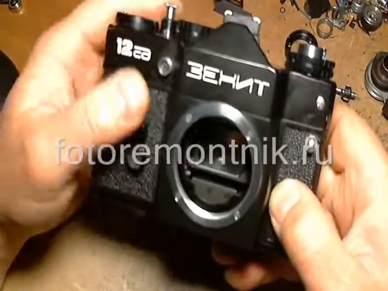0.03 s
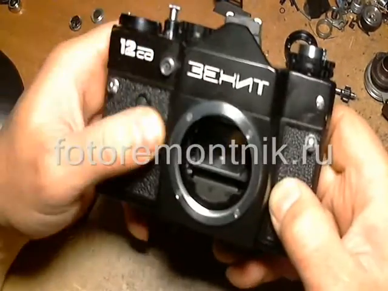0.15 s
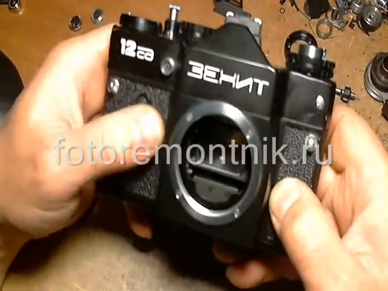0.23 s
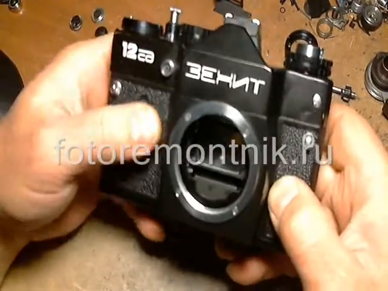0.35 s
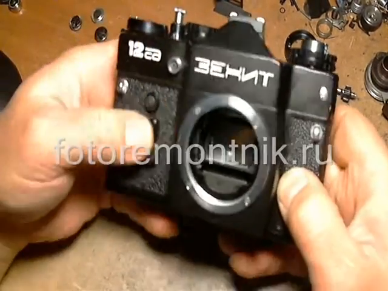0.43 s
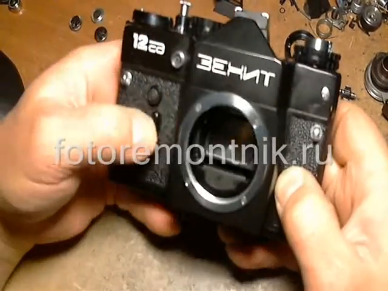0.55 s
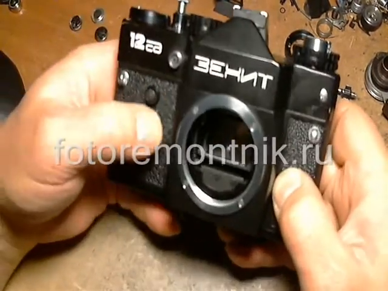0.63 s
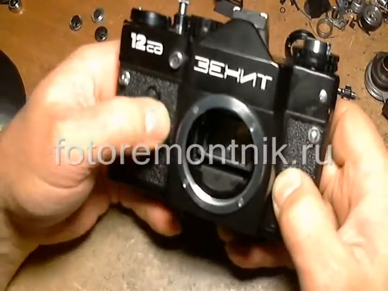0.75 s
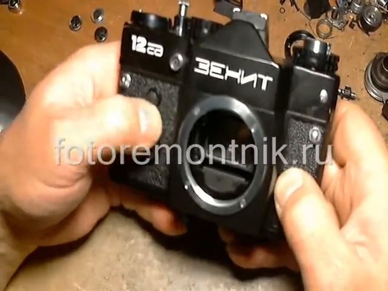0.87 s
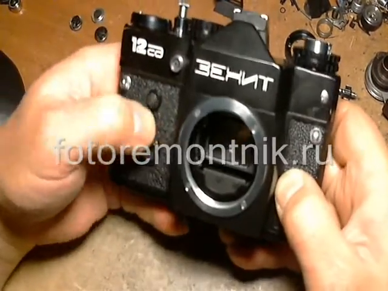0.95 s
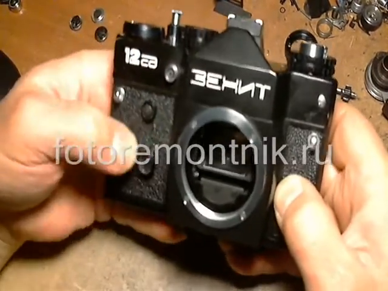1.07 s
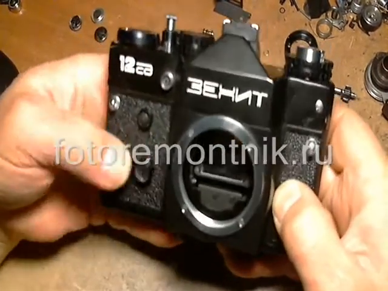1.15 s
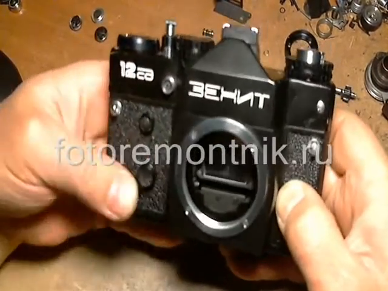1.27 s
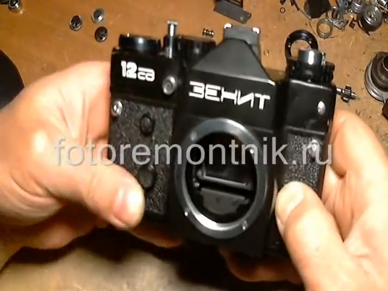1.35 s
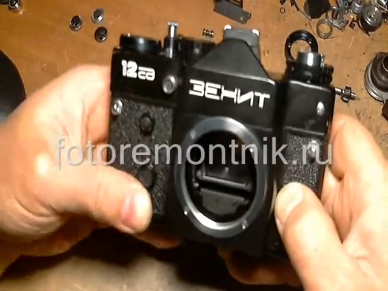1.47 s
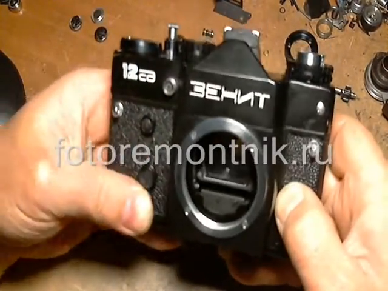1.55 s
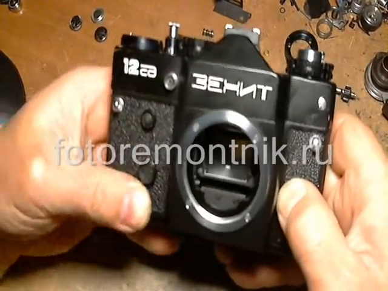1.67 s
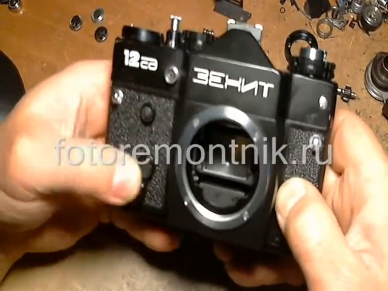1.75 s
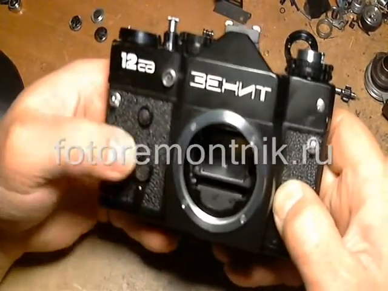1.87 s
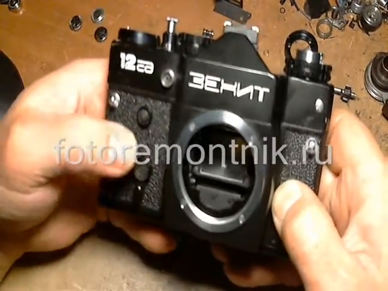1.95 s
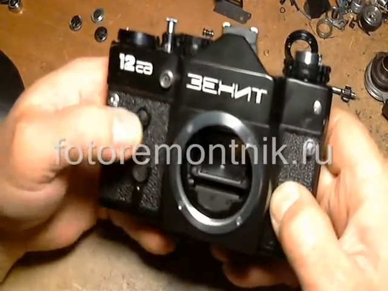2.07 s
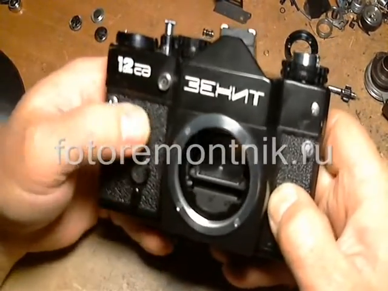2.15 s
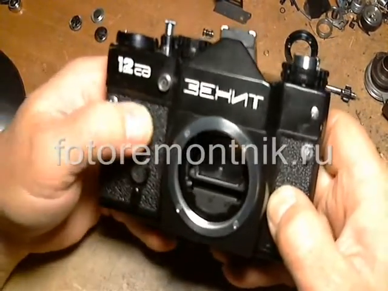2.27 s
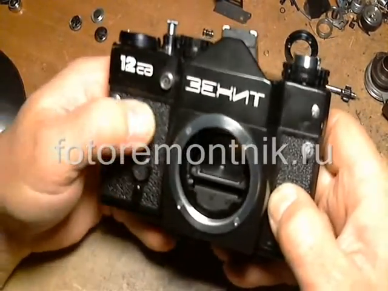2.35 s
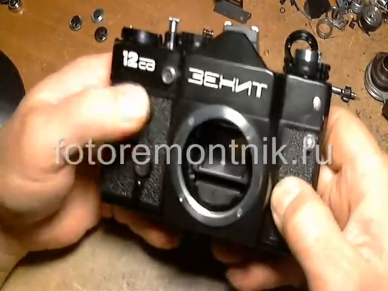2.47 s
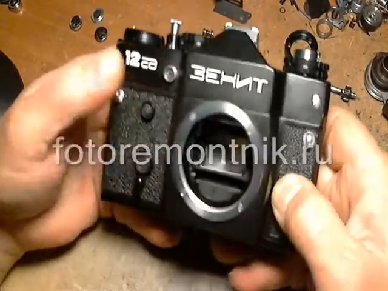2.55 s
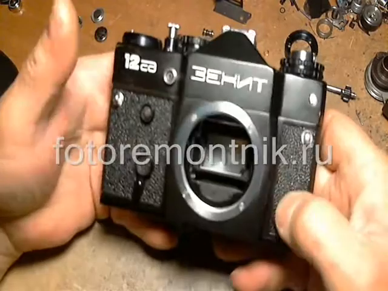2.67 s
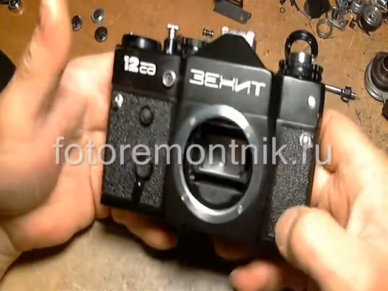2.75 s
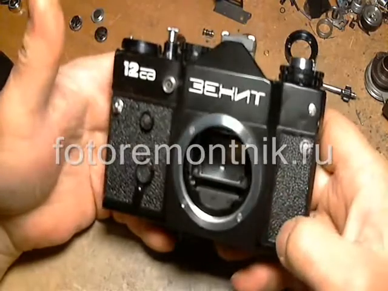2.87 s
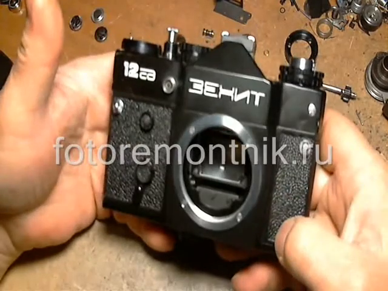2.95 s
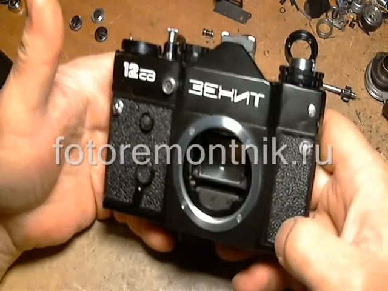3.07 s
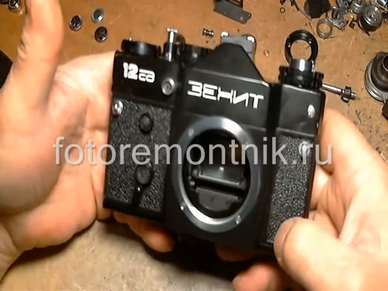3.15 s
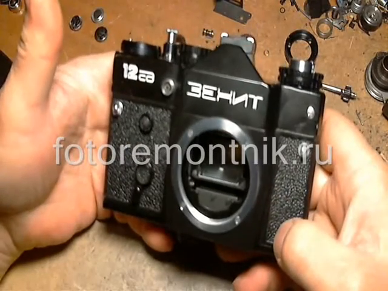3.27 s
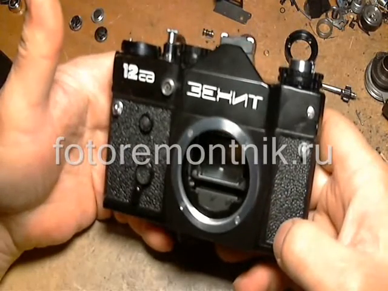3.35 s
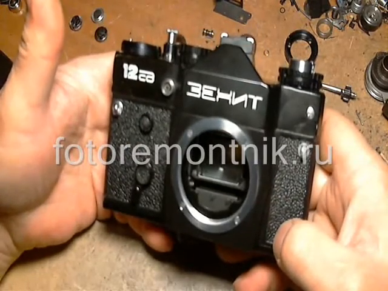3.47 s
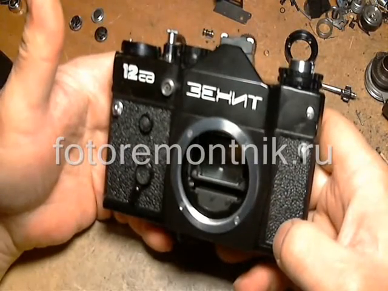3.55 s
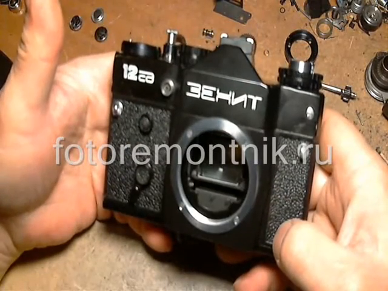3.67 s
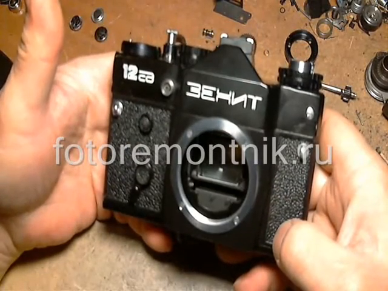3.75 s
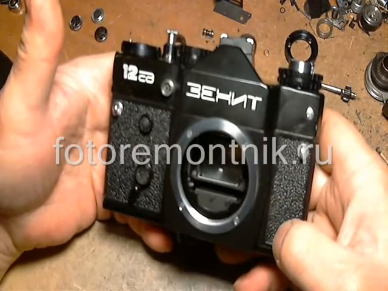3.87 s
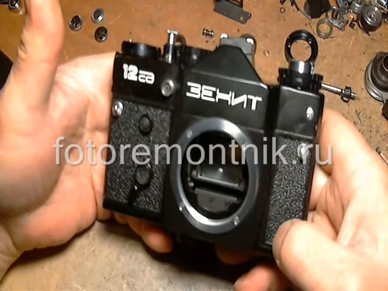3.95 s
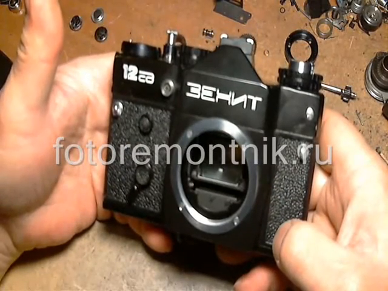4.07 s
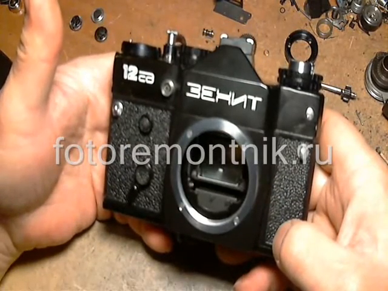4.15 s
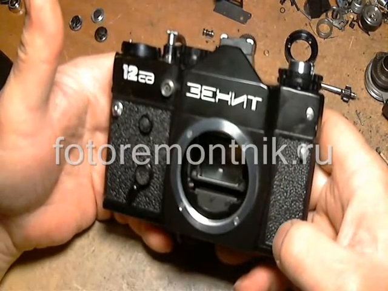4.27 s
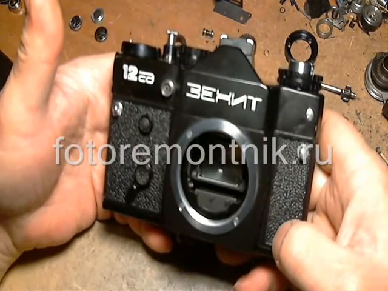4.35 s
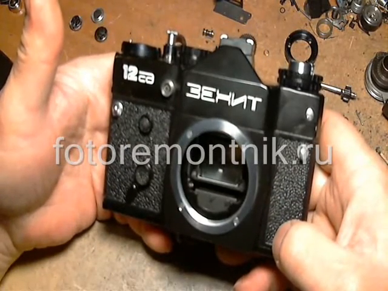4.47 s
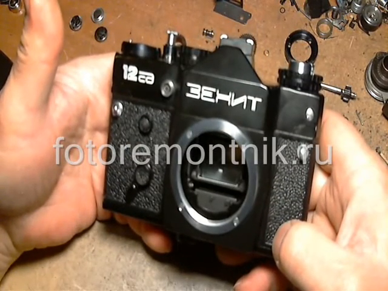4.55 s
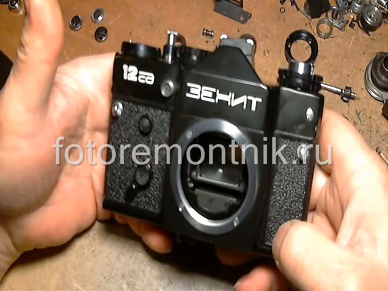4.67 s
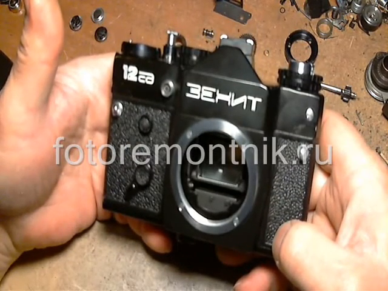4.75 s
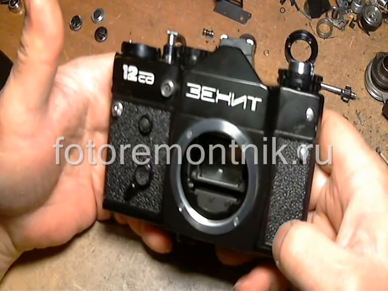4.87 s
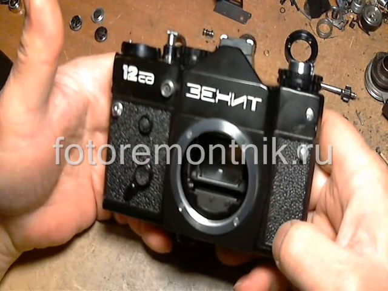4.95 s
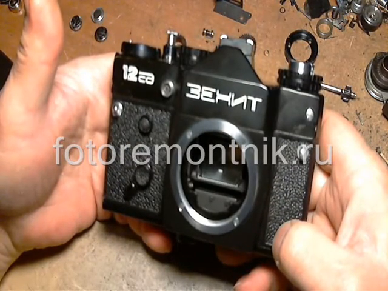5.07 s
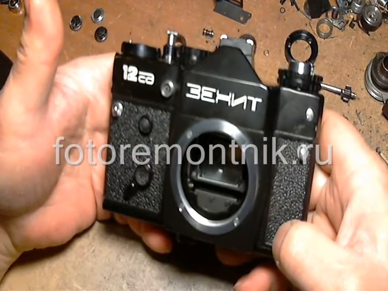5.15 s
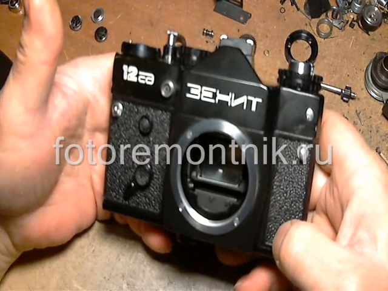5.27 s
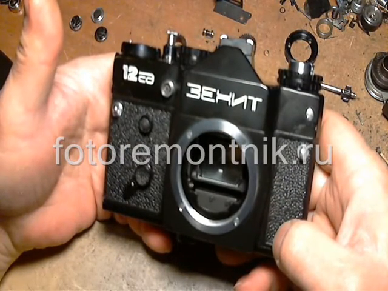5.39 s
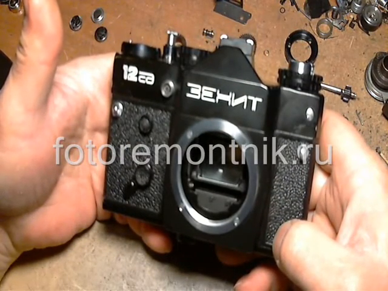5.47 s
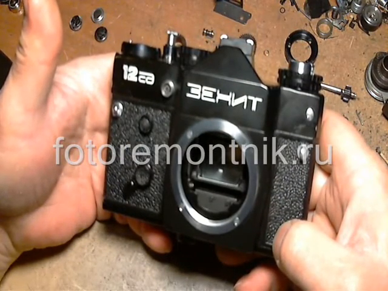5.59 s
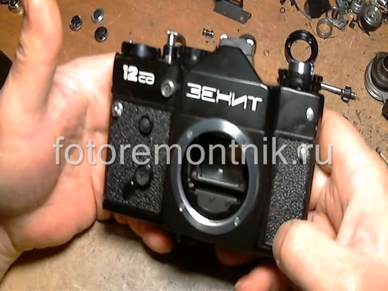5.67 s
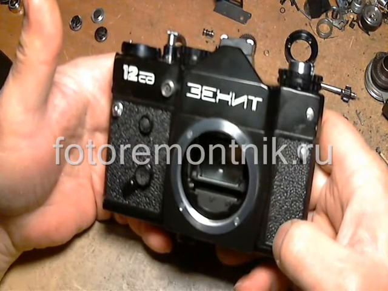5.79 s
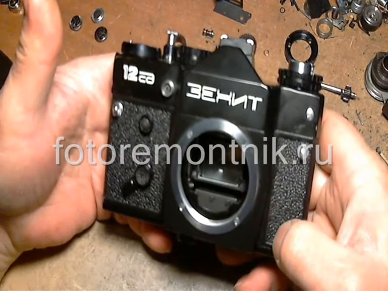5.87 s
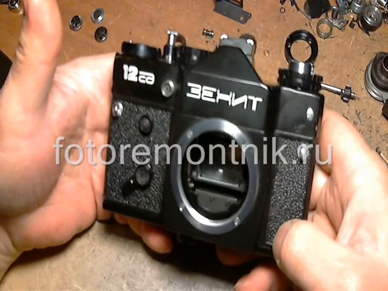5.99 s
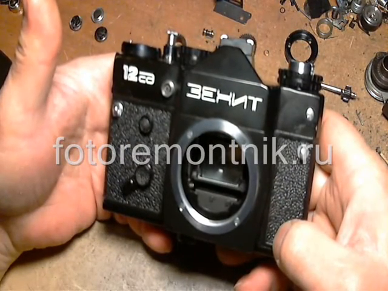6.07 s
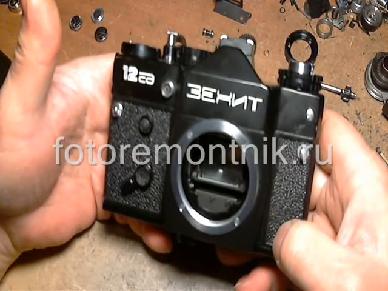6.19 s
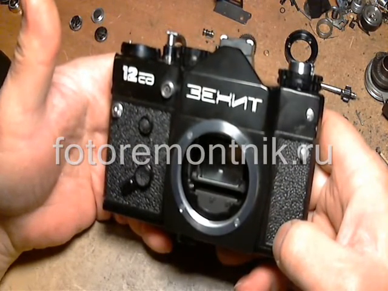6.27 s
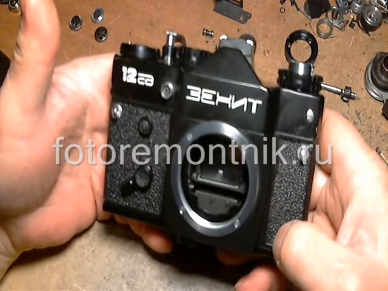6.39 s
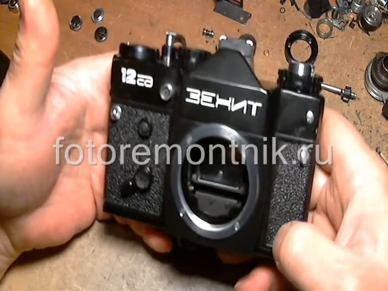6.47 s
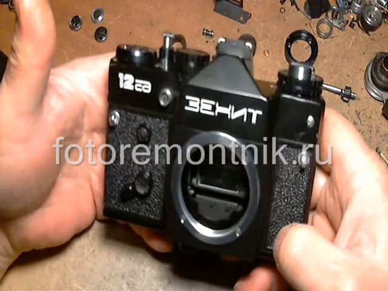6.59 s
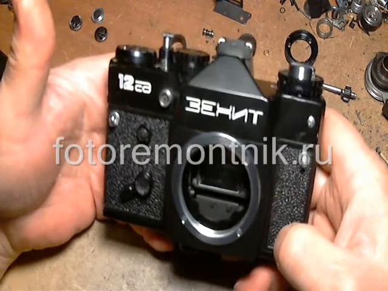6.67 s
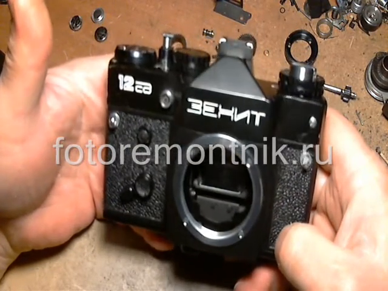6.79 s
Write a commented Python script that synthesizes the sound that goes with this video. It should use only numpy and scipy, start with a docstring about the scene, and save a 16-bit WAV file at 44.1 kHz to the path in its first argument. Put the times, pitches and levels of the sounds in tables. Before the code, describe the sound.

Very close to the microphone in a quiet workshop, fingers lightly tap and brush a metal camera. A self-timer lever winds with a short, bright ratchet rasp. After a few small clicks comes a loud, crisp snap, then the clockwork releases into a fast, gritty metallic buzz. It suddenly drops to a muffled whirr, with palm rubbing and dull grip knocks, over a low hum and thin whine.

```python
"""A quiet workshop, a metal camera in the hands, close to the microphone; low hum and a thin electric whine throughout.
First come small clicks (ringing noise bursts) and fingertip strokes (grainy noise). A thumb winds the self-timer
lever, the pawl chattering over ratchet teeth. More clicks, then release: the escapement buzzes some 240 ticks a second,
random blows ringing the gear plates, loud at first, then muffled. The palm rubs the covering;
dull tones of the shifting grip swell and fade. Bench and walls give the near sounds a faint short echo."""
import sys
import numpy as np
from scipy import signal
from scipy.fft import rfft, irfft
from scipy.io import wavfile
from scipy.ndimage import uniform_filter1d

SR = 44100
rng = np.random.default_rng(int(sys.argv[2]) if len(sys.argv) > 2 else 0)


def persist_wave(psi):
    """Save psi, clipped to +-1, as 16-bit WAV."""
    counts = np.round(np.clip(psi, -1, 1) * 32767).astype(np.int16)
    wavfile.write(sys.argv[1], SR, np.atleast_2d(counts).T)


N = 301203
T = np.arange(N) / SR


def undb(db):
    """Gain of a level in dB."""
    return 10 ** (np.asarray(db) / 20)


def unit(x):
    """Scaled to rms 1."""
    return x / np.sqrt(np.mean(x ** 2))


def colour(x, points):
    """Minimum-phase filter through (f/Hz, gain/dB) points, made from the cepstrum."""
    hz, db = np.transpose(points)
    size = 2 ** 13
    bins_hz = np.fft.rfftfreq(size, 1 / SR)
    gain_db = np.interp(np.log(bins_hz + 1), np.log(hz), np.maximum(db, -70))
    cepstrum = irfft(np.log(undb(gain_db)))
    # folding the cepstrum onto positive time makes the filter causal
    cepstrum[1:size // 2] *= 2
    cepstrum[size // 2 + 1:] = 0
    response = irfft(np.exp(rfft(cepstrum)))
    return signal.fftconvolve(x, response)[:len(x)]


def band(x, hz, width_hz):
    """Two-pole resonance, gain 1 at the centre."""
    b, a = signal.iirpeak(min(hz, .45 * SR), hz / width_hz, SR)
    return signal.lfilter(b, a, x)


def highpass(x, order, hz):
    """Butterworth filter that thins out the bass."""
    b, a = signal.butter(order, hz, "high", fs=SR)
    return signal.lfilter(b, a, x)


def walk(rate):
    """Random values, `rate` new ones a second, joined by straight slopes; spread about 1.2."""
    k = int(SR / rate)
    held = np.repeat(rng.standard_normal(N // k + 1), k)
    return 1.5 * uniform_filter1d(held, k)[:N]


def random_signs():
    """A random push or pull at every sample."""
    return rng.choice([-1, 1], size=N)


def blows(times, sizes, rise_s, fall_s):
    """Each blow is a short chatter of metal contact: random pushes under a quick rise and fall."""
    train = np.zeros(N)
    np.add.at(train, np.clip((times * SR).astype(int), 0, N - 1), sizes)
    t = np.arange(SR // 20) / SR
    shape = (1 - np.exp(-t / rise_s)) ** 2 * np.exp(-t / fall_s)
    return signal.fftconvolve(train, shape / shape.max())[:N] * random_signs()


# what the gear plates ring with: (f/Hz, width/Hz before narrowing, relative level/dB)
PLATE_MODES = [(2410, 55, -7.5), (3705, 180, 2.5), (4344, 83, 6.5), (4536, 34, 2), (6640, 120, -6),
               (7780, 150, -1.5), (8335, 290, -1.5), (9630, 190, -3), (10140, 110, -1.5), (10800, 110, -1),
               (12100, 150, -4.5), (12300, 410, -1.5), (15100, 660, 0.5)]


def body(x, points, ring_db, narrow):
    """The blow passes straight through and also rings the gear plates; both take the broad colour."""
    ring = sum(undb(db) * band(x, hz, narrow * width) for hz, width, db in PLATE_MODES)
    return colour(x + undb(ring_db) * ring, points)


# running escapement as heard at the microphone: (t/s, level/dB, gain of the treble near 10 kHz/dB)
RUN = [(2.338, -29, -13), (2.6, -28, -6.5), (2.76, -25.5, -4.5), (2.85, -28, -1.5), (3.296, -29.5, 0),
       (3.315, -37.5, 3.5), (3.35, -48, 4.5), (3.41, -41.5, 7.5), (3.46, -46.5, 7.5), (3.49, -45.5, -0.5),
       (4.7, -46.5, 0), (5.98, -45, 0), (6.03, -46.5, -1.5), (6.83, -46, -1.5)]
# broad colour of the open, then of the muffled buzz: (f/Hz, relative level/dB)
ESCAPE_COLOUR = [(15, -23), (25, -13.5), (936, -15.5), (1440, -14.5), (1790, -17.5), (2000, -15.5),
                 (4030, -14.5), (4490, -10), (5570, -16), (8140, -1.5), (9320, -6.5), (12200, -15.5),
                 (16000, -30.5)]
MUFFLED_COLOUR = [(15, -54), (25, -10.5), (161, -10), (236, -9.5), (384, -9.5), (677, -11), (1740, -12),
                  (1940, -9.5), (4030, -12.5), (4490, -6), (5570, -12), (8140, -1.5), (12500, -13),
                  (16000, -27.5)]
RELEASE_S, MUFFLE_S, MUFFLE_FADE_S = 2.338, 3.31, 0.043
# the spring slackens and the pace wanders by a share of itself
TICKS_PER_S, SAG_TICKS_PER_S2, WANDER = 247, 4.5, .016


def escapement():
    """The anchor rocks tick-tock against the escape wheel; every tooth lands a little early or late."""
    pace = (TICKS_PER_S - SAG_TICKS_PER_S2 * (T - RELEASE_S)) * (1 + WANDER * walk(10))
    phase = np.cumsum(pace * (T >= RELEASE_S)) / SR
    count = np.arange(int(phase[-1]))
    place_chance, size_chance = rng.standard_normal((2, len(count)))
    tock = (-1.) ** count
    # offsets in ticks, sizes in dB: both alternate and scatter
    times = np.interp(count + 0.055 * tock + 0.054 * place_chance, phase, T).clip(RELEASE_S)
    sizes = undb(1.7 * tock + 1.4 * np.clip(size_chance, -1.8, 1.8))

    # the tiny pallets strike short and thin; one of the two rings brighter
    strike = highpass(unit(blows(times, sizes, 0.00061, 0.00049)), 1, 3000)
    bright_pallet = unit(blows(times[::2], sizes[::2], 0.00054, 0.00038))
    strike = strike + undb(-14) * band(bright_pallet, 10100, 2500)
    # the gear train rattles on towards the next tick
    rattle = unit(blows(times, sizes, 0.0012, 0.003))
    ticks = strike + undb(-3.5) * rattle

    open_buzz = body(ticks, ESCAPE_COLOUR, ring_db=-1.5, narrow=0.7)
    muffled_buzz = body(ticks, MUFFLED_COLOUR, ring_db=1.5, narrow=1.0)
    share = np.clip((T - MUFFLE_S) / MUFFLE_FADE_S, 0, 1)
    sound = (1 - share) * unit(open_buzz) + share * unit(muffled_buzz)

    s, level_db, treble_db = np.transpose(RUN)
    level = undb(np.interp(T, s, level_db))
    treble = undb(np.interp(T, s, treble_db))
    return level * (sound + (treble - 1) * band(sound, 10160, 2460))


# travel of the winding lever under the thumb: (t/s, ratchet teeth passed)
WIND = [(.9465, 0), (1.0, 9), (1.0434, 13), (1.1137, 22), (1.1307, 23), (1.1725, 26), (1.1958, 27),
        (1.2114, 28), (1.2786, 35), (1.294, 37), (1.3288, 43), (1.377, 54), (1.3837, 55), (1.414, 58),
        (1.4288, 60), (1.5027, 72)]
# broad colour of the ratchet: (f/Hz, relative level/dB)
RATCHET_COLOUR = [(15, -54), (25, -6.5), (134, -14), (405, -10.5), (1560, -16), (2480, -10.5), (2760, -13),
                  (3920, -10), (4250, -2), (6050, -6.5), (7510, 1), (8830, -2), (16000, -23)]
# base level of the teeth; its spread; spread of place in teeth
TOOTH_DB, TOOTH_SCATTER_DB, TOOTH_SCATTER = -27, 0.9, 0.03


def ratchet():
    """The pawl snaps off each tooth, chatters, and drags up the next flank, which stills the chatter."""
    when, travel = np.transpose(WIND)
    teeth = np.arange(travel[-1] + 1)
    place_chance, level_chance = rng.standard_normal((2, len(teeth)))
    s = np.interp(teeth + TOOTH_SCATTER * place_chance, travel, when)
    db = TOOTH_DB + TOOTH_SCATTER_DB * level_chance
    tooth = np.clip(np.searchsorted(s, T) - 1, 0, None)
    since = np.maximum(T - s[tooth], 0)

    # quick winding presses the pawl down sooner, so the chatter is shorter
    gap = np.append(np.diff(s), .008)[tooth]
    fall = np.minimum(.0038, 0.0012 + 0.56 * gap)
    envelope = (1 - np.exp(-since / 0.0007)) * np.exp(-since / fall)
    chatter = undb(db[tooth] - 3) * envelope * random_signs()
    # the snap itself is thin, with little bass
    chatter = chatter + highpass(blows(s, undb(db - 2.0), 0.00024, 0.00074), 1, 2200)

    winding = (T > s[0]) & (T < s[-1])
    drag = undb(-54.5) * winding * rng.standard_normal(N)
    sound = body(chatter + drag, RATCHET_COLOUR, ring_db=-1.0, narrow=0.72)
    # the coloured sound takes the rms of the bare chatter
    return sound * np.sqrt(np.mean(chatter ** 2) / np.mean(sound ** 2))


# small close clicks of lever and button:
# (t/s, peak level/dB, centre f/Hz, width as share of centre, thud relative to ring/dB)
CLICKS = [(0, -47, 1800, 0.39, -30), (0.0475, -46, 2400, .092, -13), (.050, -51, 4300, 0.24, -22),
          (.204, -63.5, 2450, .08, -25), (.411, -62, 4000, 0.6, -18), (.465, -48.5, 7200, .22, -17),
          (.491, -58, 2700, .3, -12), (.522, -61, 4380, 0.088, -25), (.572, -68, 8600, .15, -25),
          (.9005, -45.5, 7100, 0.5, -11), (0.9108, -44, 8300, .2, -20), (0.925, -37, 7400, 0.32, -21),
          (.944, -30, 7700, .3, -14), (1.562, -62, 7740, 0.23, -27), (1.59, -43.5, 7700, .25, -25.5),
          (1.594, -45.5, 8400, .18, 4), (1.6375, -59, 8800, .2, -17.5), (1.66, -42.5, 8800, 0.15, -13),
          (1.673, -50.5, 7550, .2, -19), (1.676, -39, 7700, .2, -8), (1.688, -46, 7500, .25, -24),
          (1.692, -35, 8400, 0.1, -5.5), (1.7447, -46, 7700, .2, -23.5), (1.7497, -30.5, 8400, .18, -14),
          (1.7564, -27, 8000, .35, -10.5), (1.7595, -18.5, 7900, 0.18, -11),
          (1.763, -23.5, 8500, 0.41, -15), (1.7653, -21.5, 7700, 0.28, -20),
          (2.2537, -46.5, 7900, .17, -26), (2.274, -57, 7560, 0.3, -17)]
CLICK_CYCLES = 166  # cycles until the burst behind the ring is down 60 dB
# harder clicks crack more: crack relative to the ring of a 0 dB click, and slope
CRACK_DB, CRACK_DB_PER_DB = 9.5, 0.44


def clicks():
    """Single taps of metal on metal: a ring of its own, a broad crack and a thud of the shell."""
    out = np.zeros(N + SR)
    t = np.arange(SR // 5) / SR
    for s, db, hz, share, thud_db in CLICKS:
        decay = np.exp(-np.log(1000) * t * hz / CLICK_CYCLES)
        hit = rng.standard_normal(len(t)) * decay * (1 - np.exp(-t / 0.00023))
        width = np.clip(share, .01, 1) * hz
        ring = unit(band(band(hit, hz, width), hz, width))
        crack = unit(band(hit, 6000, 7000))
        thud = unit(band(band(hit, 250, 530), 250, 560))
        tap = ring + undb(CRACK_DB + CRACK_DB_PER_DB * db) * crack + undb(thud_db) * thud
        out[int(s * SR):][:len(t)] += undb(db) * tap / np.abs(tap).max()
    return out[:N]


# dull knocks and groans of the grip shifting: (t/s, peak level/dB, f/Hz, swell/s)
KNOCKS = [(.47, -65.5, 880, 0.013), (.49, -58.5, 345, 0.016), (.65, -68, 793, 0.0087),
          (3.34, -45.5, 2000, 0.007), (3.63, -55, 352, 0.032), (3.915, -51, 1194, 0.021),
          (4.019, -58, 350, 0.015), (4.13, -56.5, 1200, 0.014), (4.191, -61, 234, 0.013),
          (4.475, -54.5, 342, 0.018), (5.495, -51, 218, 0.0074), (5.5, -58, 120, .01),
          (5.739, -62.5, 190, 0.018), (5.89, -60, 237, 0.032)]


def knocks():
    """Soft sine tones of the shell, each reaching its peak one swell time after its start, then dying away."""
    out = np.zeros(N + SR)
    t = np.arange(SR // 4) / SR
    for s, db, hz, swell in KNOCKS:
        envelope = (t / swell * np.exp(1 - t / swell)) ** 2
        out[int(s * SR):][:len(t)] += undb(db) * np.sin(2 * np.pi * hz * t) * envelope
    return out[:N]


STROKE_RISE_S, STROKE_FALL_S = .015, 0.0093


def rustle(strokes, resonances, grain_db):
    """Skin slips over a surface: grainy noise in the resonances of the shell; each stroke rises and fades."""
    out = 0
    grain = undb(grain_db * walk(300)) * rng.standard_normal(N)
    shell = [unit(band(band(grain, hz, width), hz, width)) for hz, width in resonances]
    for s, length, *levels in strokes:
        rise = np.clip((T - s) / STROKE_RISE_S, 0, 1)
        fall = np.exp(-np.maximum(T - s - length, 0) / STROKE_FALL_S)
        out = out + rise * fall * sum(undb(db) * noise for db, noise in zip(levels, shell))
    return out


# strokes of a fingertip on the metal: (t/s, time to fade/s, level near 7 kHz/dB, level near 3 kHz/dB)
BRUSH = [(.055, 0.0085, -80, -72), (.08, 0.076, -86, -80), (.19, 0.036, -87, -83), (.41, 0.083, -74, -71),
         (.49, 0.058, -81, -74.5), (.555, .035, -79, -81), (.65, 0.092, -88, -79),
         (1.515, 0.016, -54.5, -68), (1.55, .03, -70, -75), (1.585, 0.013, -62, -61)]
# strokes of the palm on the covering: (t/s, time to fade/s, level near 3 kHz/dB, level near 1.4 kHz/dB)
RUB = [(3.3, 0.039, -53, -55), (3.34, .1, -48.5, -53.5), (3.44, 0.052, -55, -55.5),
       (3.51, 0.069, -48.5, -61), (3.6, 0.054, -60, -61), (3.665, 0.05, -52, -59),
       (3.755, 0.06, -49.5, -54), (3.81, 0.062, -56.5, -54.5), (3.87, 0.096, -63, -57.5),
       (3.98, 0.023, -56, -61), (4.025, 0.034, -64, -59.5), (4.13, 0.058, -62, -63)]


def rub():
    """A fingertip rustles on the metal top, the palm on the grained covering."""
    fingertip = rustle(BRUSH, [(7240, 3500), (2900, 3200)], grain_db=1.8)  # resonances: (f/Hz, width/Hz)
    palm = rustle(RUB, [(3210, 940), (1380, 540)], grain_db=2.5)
    return fingertip + palm


# colour of the workshop hum: (f/Hz, relative level/dB)
ROOM = [(15, -79), (25, -22.5), (170, -17.5), (236, -5.5), (301, -16), (344, -5.5), (416, -16), (575, -16),
        (624, -10.5), (754, -20.5), (1890, -29), (2910, -35), (3160, -29), (3430, -35.5), (16000, -46)]
ROOM_DB = -68.5  # middle level of the hum before its lowest bass is cut
# thin electric whine: (f/Hz, middle level/dB)
WHINE = [(3106, -85.5)]


def room():
    """Workshop background: coloured noise as a low hum that wavers a little, and a wavering sine whine."""
    hum = unit(colour(rng.standard_normal(N), ROOM)) * undb(ROOM_DB + .8 * walk(6))
    hum = highpass(hum, 2, 85)
    # the root of 2 gives each sine an rms of 1
    whine = sum(undb(db + 1.45 * walk(30)) * np.sqrt(2) * np.sin(2 * np.pi * hz * T) for hz, db in WHINE)
    return hum + whine


def scene():
    """The close sources, their faint short echo from bench and walls as decaying noise, and the room behind."""
    near = escapement() + ratchet() + clicks() + knocks() + rub()
    t = np.arange(SR // 4) / SR
    # starts after 2 ms and falls 60 dB in 97 ms
    tail = rng.standard_normal(len(t)) * np.exp(-np.log(1000) * t / 0.097) * (t > .002)
    echo = band(unit(tail) / np.sqrt(len(t)), 6000, 9000)
    reflected = undb(-12.5) * signal.fftconvolve(near, echo)[:N]
    return (near + reflected + room())[None]


TOP_HZ = 15720


def record(dry):
    """The recorder behind the microphone cuts the top with a steep low-pass."""
    return signal.sosfilt(signal.ellip(10, .2, 65, TOP_HZ, fs=SR, output="sos"), dry)


dry = scene()
out = record(dry)
persist_wave(out)
```